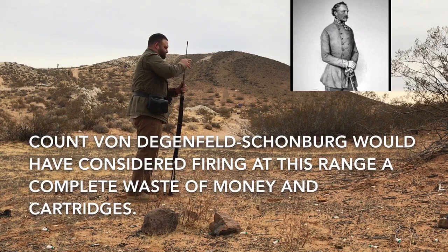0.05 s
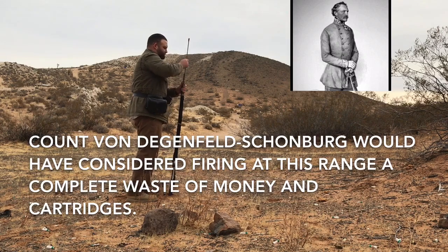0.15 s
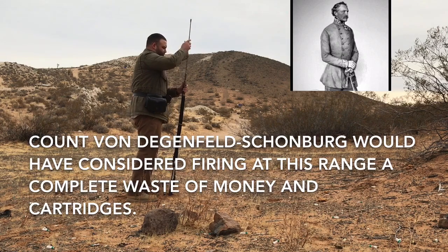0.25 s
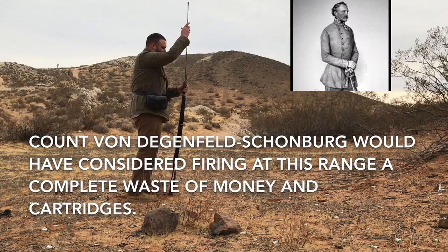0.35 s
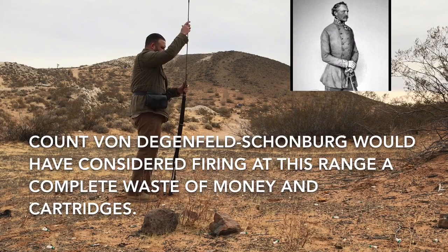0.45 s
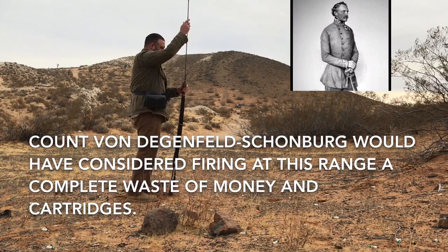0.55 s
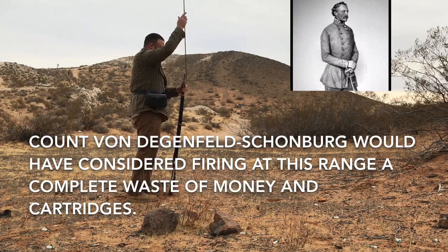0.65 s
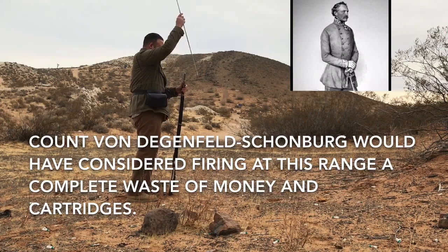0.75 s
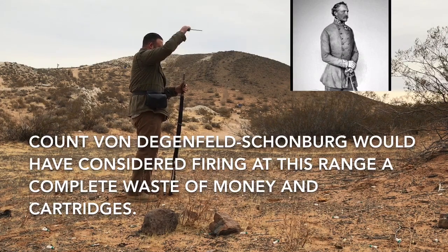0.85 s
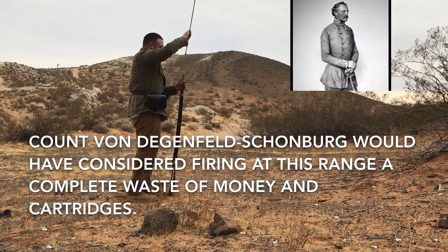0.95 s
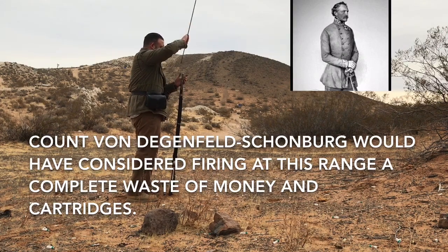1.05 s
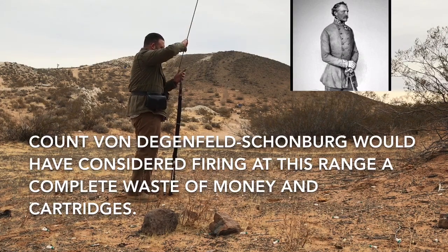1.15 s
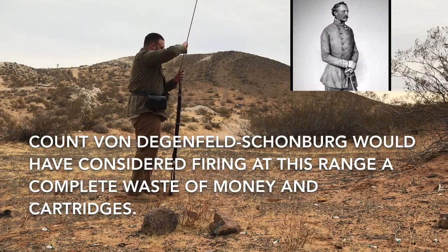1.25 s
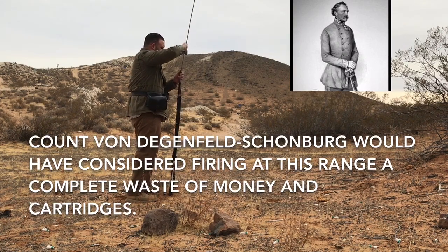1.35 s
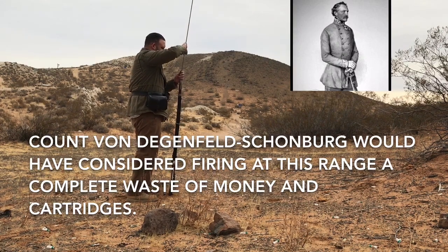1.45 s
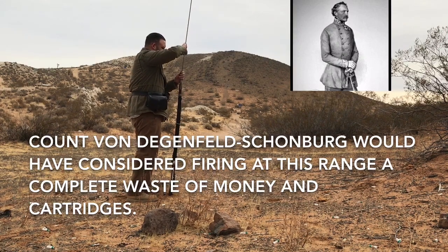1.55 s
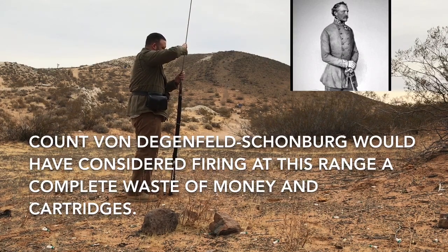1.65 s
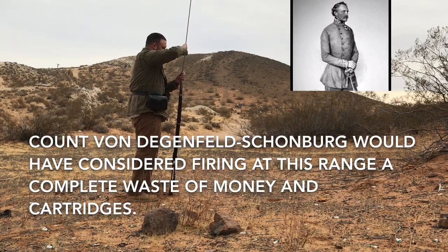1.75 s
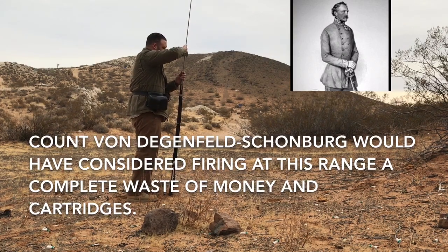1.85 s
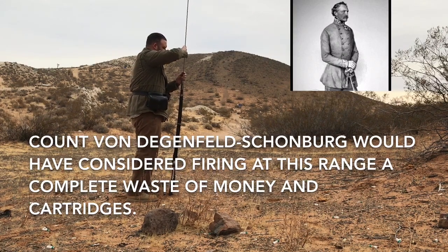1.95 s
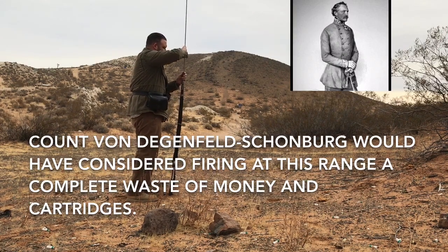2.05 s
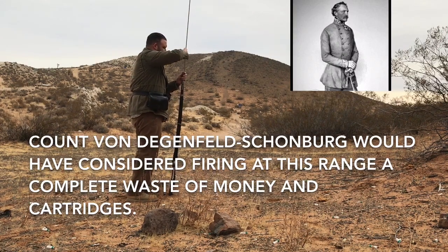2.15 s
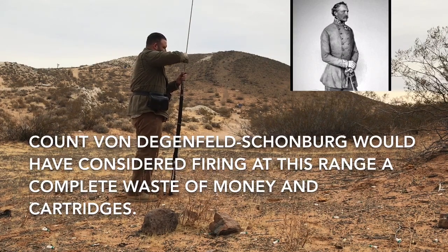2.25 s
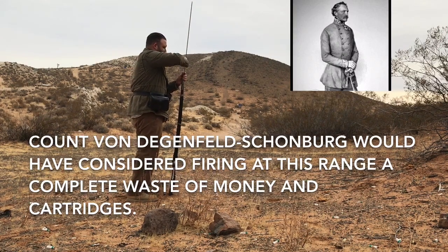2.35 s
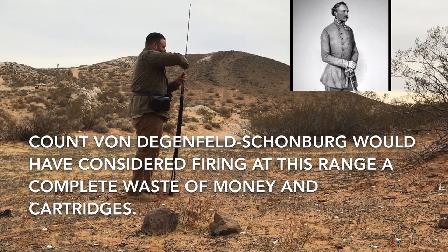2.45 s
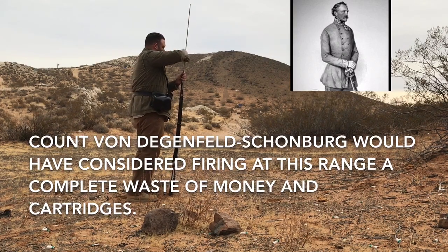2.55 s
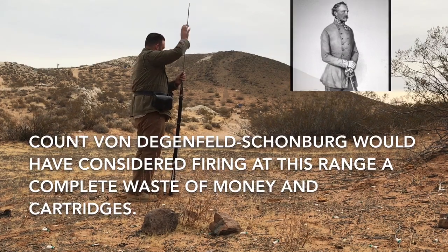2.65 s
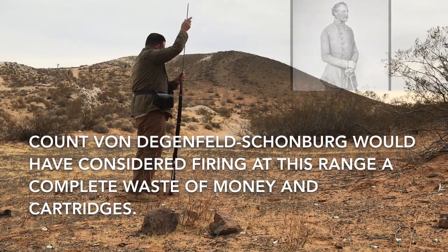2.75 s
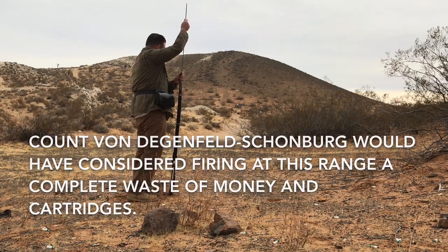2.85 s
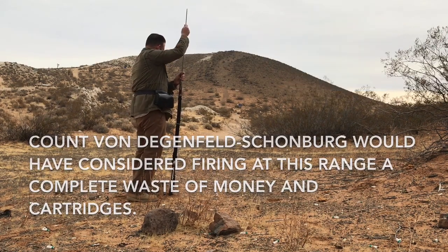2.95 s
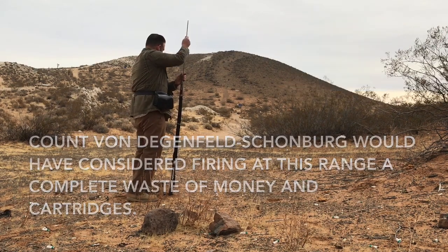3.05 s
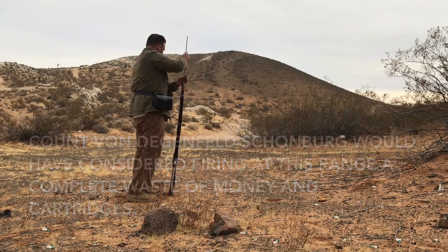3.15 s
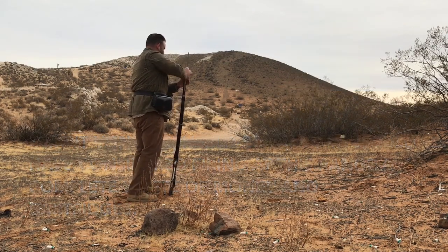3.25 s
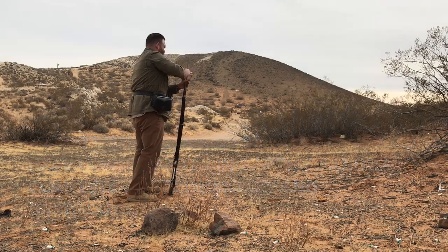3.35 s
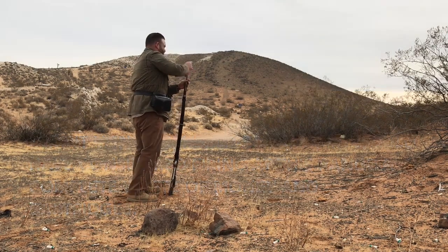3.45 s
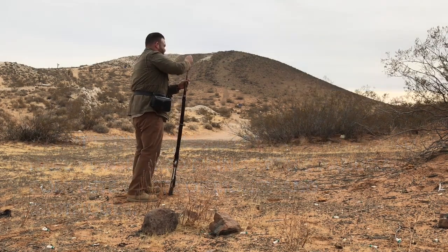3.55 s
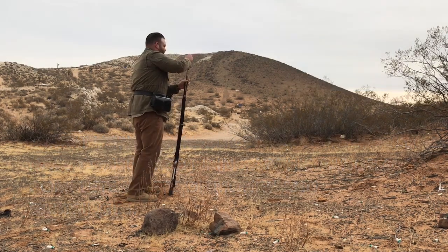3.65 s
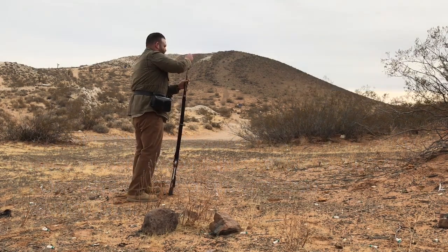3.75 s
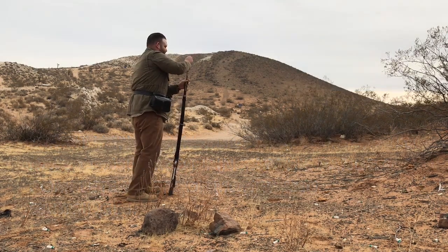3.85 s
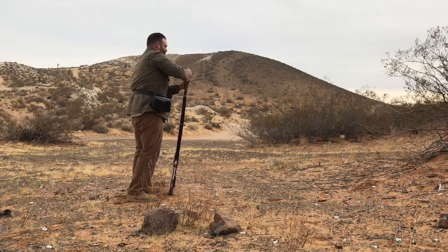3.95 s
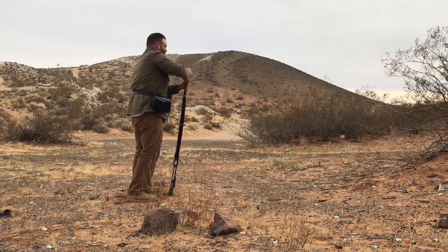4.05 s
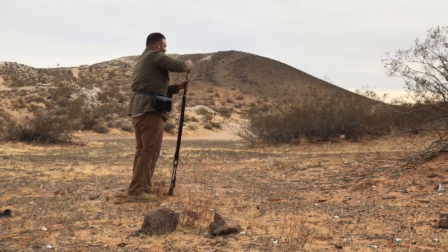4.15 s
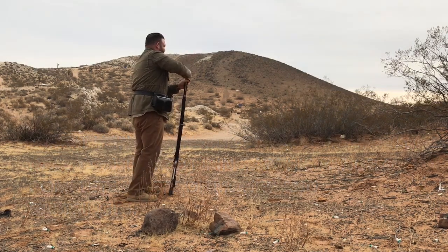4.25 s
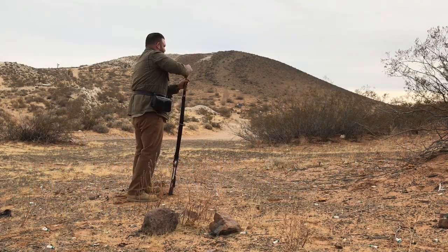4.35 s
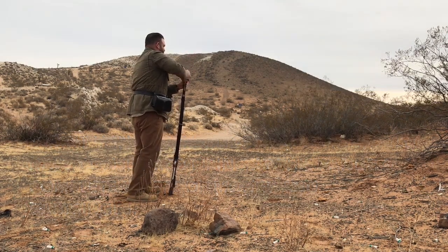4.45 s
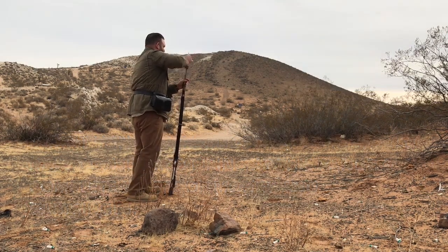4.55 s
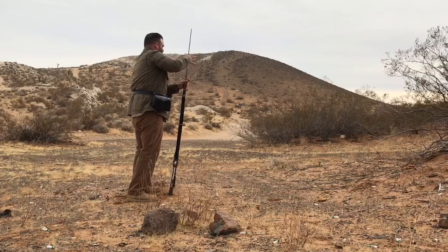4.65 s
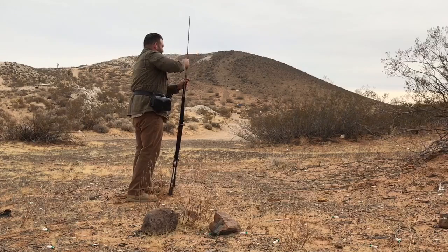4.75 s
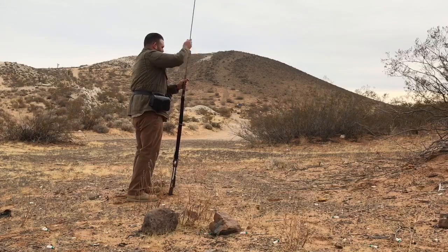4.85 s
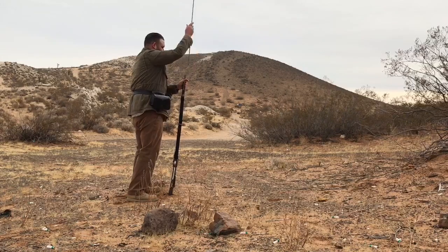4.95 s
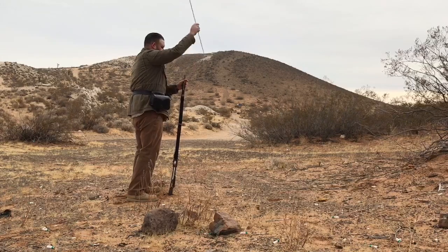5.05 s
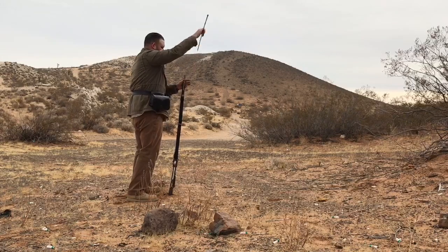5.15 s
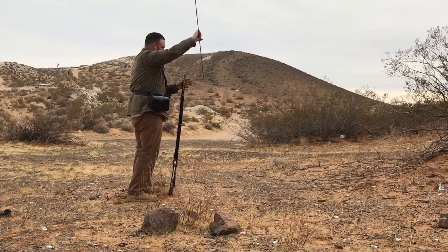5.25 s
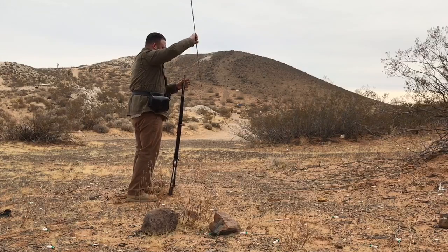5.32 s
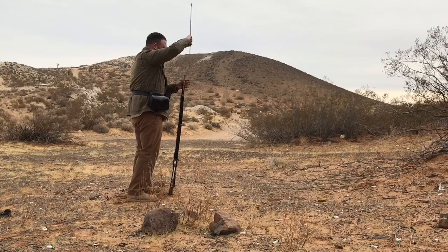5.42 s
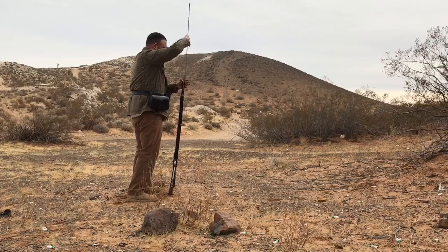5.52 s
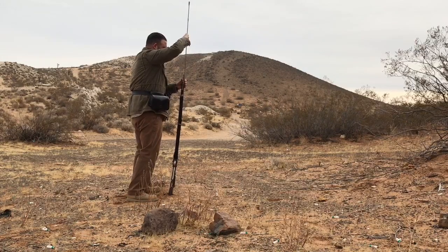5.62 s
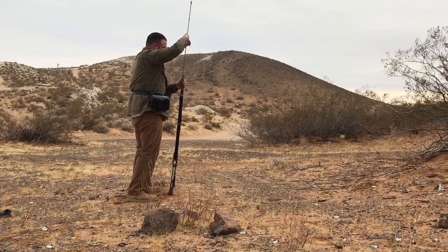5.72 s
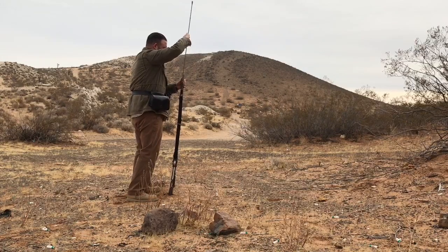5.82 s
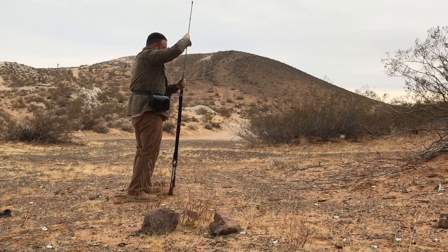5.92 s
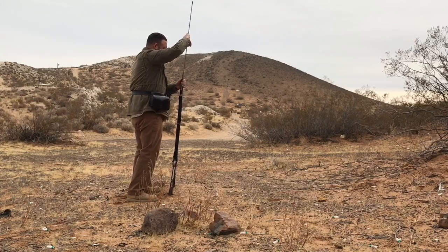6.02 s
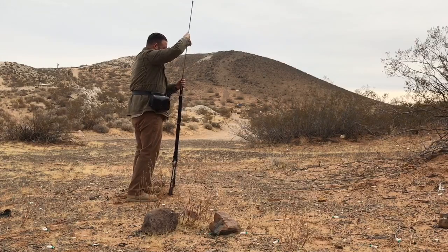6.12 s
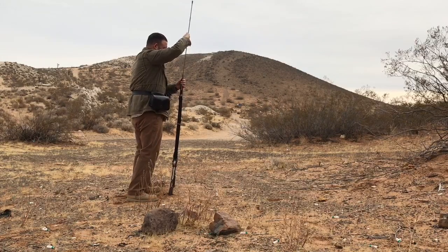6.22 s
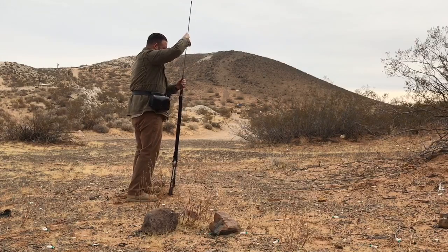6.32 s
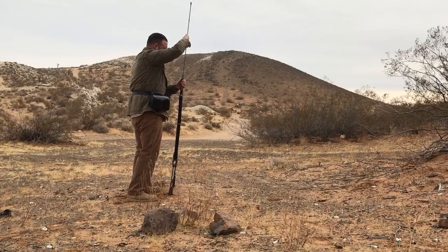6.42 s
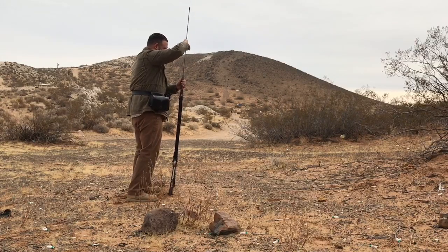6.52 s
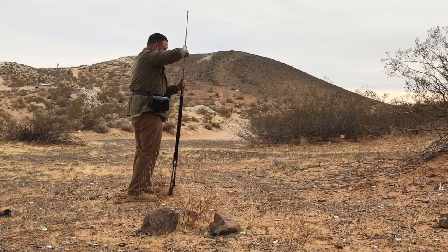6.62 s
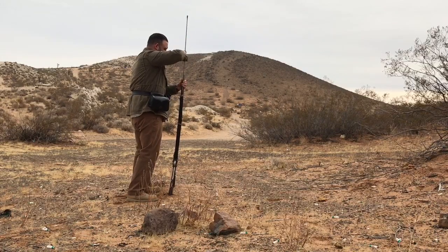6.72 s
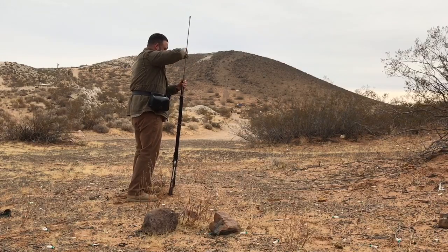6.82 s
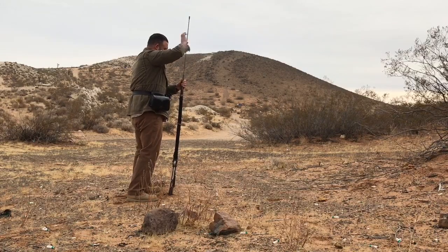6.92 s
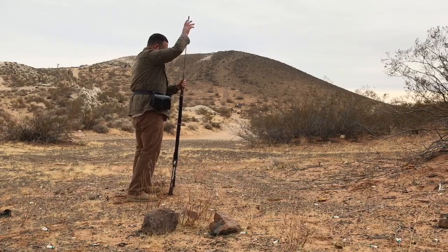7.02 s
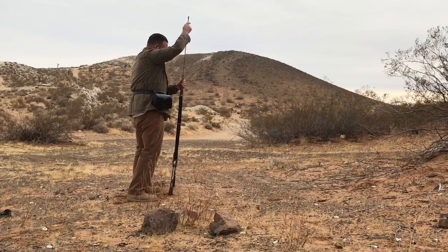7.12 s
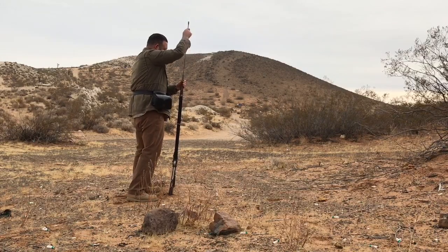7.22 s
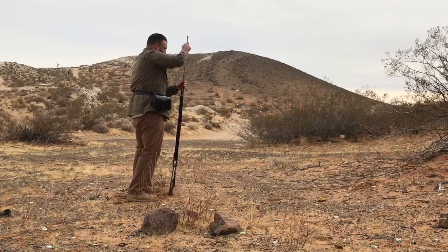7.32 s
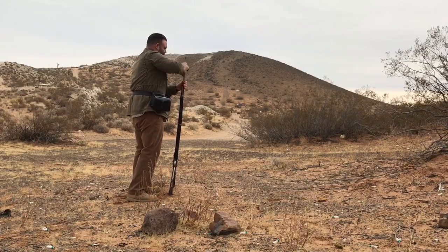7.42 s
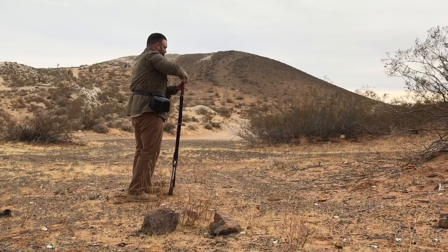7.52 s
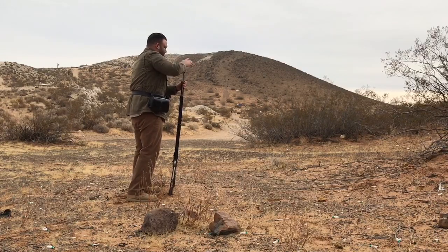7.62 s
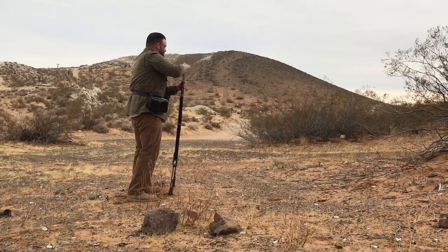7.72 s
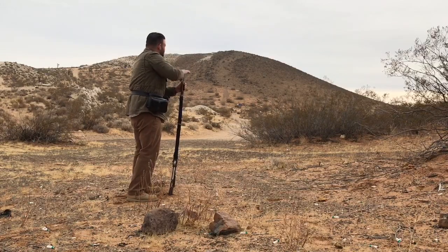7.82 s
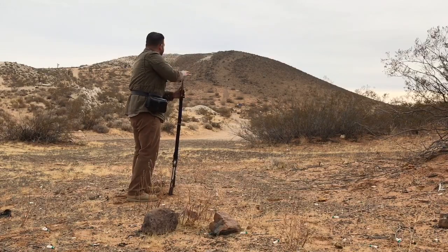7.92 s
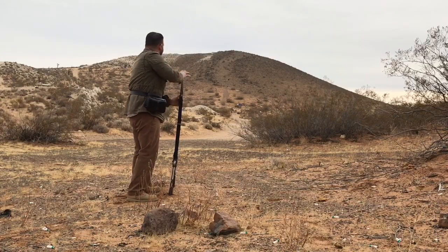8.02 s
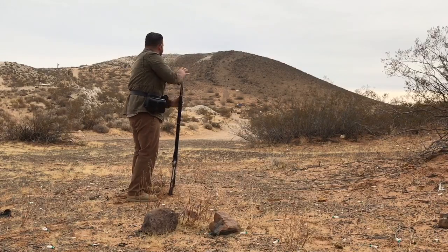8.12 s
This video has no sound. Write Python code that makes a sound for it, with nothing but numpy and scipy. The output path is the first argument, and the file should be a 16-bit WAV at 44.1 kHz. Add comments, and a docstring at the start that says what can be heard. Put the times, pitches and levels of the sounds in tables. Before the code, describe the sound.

Low, faint wind rumble lies under sparse metal clicks, brief gritty rasps and dull knocks as a rifle is loaded at the muzzle outdoors. A sharp hit starts nearly a second of dense steel chatter, then it falls quiet. A hard metallic knock with rebounds follows, then coarse cloth brushing, a thin high scrape and finally the loudest sound, a single abrupt clack. Close microphone, with hardly any echo.

```python
"""A steel ramrod taps and chatters in the barrel and at the muzzle of a muzzleloading rifle: noise bursts ring
barrel resonances and fading rod notes. It scrapes down and out again as filtered random slips, then slides back
into the stock and seats with one sharp clack. A man is loading in open desert, heard close and nearly dry:
dull knocks and the low body of harder rod blows are short noise bursts, his sleeve rustles as sparse grains,
a few low thuds swell, and low wind, made of coloured noise, rumbles on the microphone."""
import sys
import numpy as np
from scipy import signal
from scipy.fft import rfft, irfft, next_fast_len
from scipy.io import wavfile
from scipy.ndimage import uniform_filter1d

SR = 44100
rng = np.random.default_rng(int(sys.argv[2]) if len(sys.argv) > 2 else 0)


def generate_wav(signal):
    """Clip the signal to [-1, 1] and save it as 16-bit WAV at the path in sys.argv[1]."""
    frames = np.transpose(np.atleast_2d(signal))
    scaled = np.clip(frames, -1, 1) * 32767
    pcm = np.round(scaled).astype(np.int16)
    wavfile.write(sys.argv[1], SR, pcm)


N = 360738
TIME = np.arange(N) / SR
# working length of one hit (samples) and time since its start (s)
HIT_SIZE = 16384
AGE = np.arange(HIT_SIZE) / SR


def undb(db):
    """Decibels to gain."""
    return 10 ** (np.asarray(db) / 20)


def unit(x):
    """Scale to rms 1."""
    return x / np.sqrt(np.mean(x ** 2))


def blow(x, db):
    """Scale a hit so that its energy, spread over 10 ms, has this level."""
    return x * undb(db) / np.sqrt(np.sum(x ** 2) / (SR / 100))


def fade(t60):
    """Exponential decay that falls 60 dB in t60 seconds."""
    return np.exp(-np.log(1000) * AGE / max(t60, 1e-4))


def add(out, s, x):
    """Mix x in at time s."""
    i = int(s * SR)
    out[i:i + len(x)] += x[:N - i]


def colour(points, size):
    """Causal (minimum-phase) frequency response through (Hz, dB) points."""
    hz, db = np.transpose(points)
    freqs = np.fft.rfftfreq(size, 1 / SR) + 1
    gain = undb(np.interp(np.log(freqs), np.log(hz), db))
    # folding the cepstrum onto positive time makes the response causal
    cepstrum = irfft(np.log(gain), size)
    cepstrum[1:size // 2] *= 2
    cepstrum[size // 2 + 1:] = 0
    return np.exp(rfft(cepstrum))


def body(modes, direct_db):
    """Response of (Hz, width Hz, dB) resonances beside a direct path; neighbours swing in opposite sense."""
    f = np.fft.rfftfreq(HIT_SIZE, 1 / SR) + 1e-3
    response = undb(direct_db)
    for k, (hz, width, db) in enumerate(modes):
        resonance = 1j * (-1) ** k * undb(db) / (1 + 1j * (f * f - hz * hz) / (f * width))
        response = response + resonance * hz / np.hypot(f, hz / 2)
    return response


def through(x, response):
    """Filter by the first half of a frequency response's impulse."""
    return signal.fftconvolve(x, irfft(response)[:HIT_SIZE // 2])[:len(x)]


def walk(rate):
    """Random levels held 1 / rate s and slewed twice; spread near 1."""
    k = max(int(SR / rate), 1)
    steps = np.repeat(rng.standard_normal(N // k + 1), k)
    return 1.3 * uniform_filter1d(uniform_filter1d(steps, k), k)[:N]


def grains(rate, spread_db):
    """Tiny slips at random moments, mostly weak, a few strong."""
    size = undb(spread_db * np.minimum(rng.exponential(size=N), 4))
    slips = rng.random(N) < rate / SR
    return unit(slips * size * rng.choice([-1, 1], N))


def envelope(start, end, rise_db_per_s, fall_db_per_s):
    """Attack, hold from start to end, release; as a gain."""
    before, after = np.maximum(start - TIME, 0), np.maximum(TIME - end, 0)
    return undb(-rise_db_per_s * before - fall_db_per_s * after)


# ring of the loosely held rod: [f/Hz, relative level/dB, t60/s]
ROD_NOTES = [(875, -3, .14), (3835, -5, .08), (4145, -6, .1), (4393, -3, .12), (5050, -1, .093),
             (5685, -15, .1), (6788, -5, .13), (7477, -5, .12), (8210, -14, .09), (9049, -9, .09),
             (9640, -10, .1), (10370, -14, .09), (11260, -6, .065), (12190, -16, .06), (13040, -19, .07),
             (14670, -21, .06)]


def rod_modes():
    """The fading notes of the rod, one row each."""
    return np.array([undb(db) * fade(t60) * np.sin(2 * np.pi * hz * AGE) for hz, db, t60 in ROD_NOTES])


# light chatter between the blows while the rod works in the barrel: from t/s, to t/s
CHATTER_SPAN = (4.1, 4.89)
CHATTER_DB, CHATTER_SPREAD_DB, CHATTER_TREBLE_DB = -62.5, 1, -13


def chatter(count=14):
    """Light, dull taps at uneven intervals, as rows like those of ROD_TAPS."""
    chance = rng.standard_normal((count, 2))
    jitter = chance[:, 0] * np.ptp(CHATTER_SPAN) / count / 4
    times = np.linspace(*CHATTER_SPAN, count) + jitter
    levels = CHATTER_DB + CHATTER_SPREAD_DB * chance[:, 1]
    return [(s, db, CHATTER_TREBLE_DB) for s, db in zip(times, levels)]


# a harder blow has less middle and nearly the same bass; both are given for a blow of medium level
MEDIUM_DB, BASS_DB, BASS_PER_DB, MIDDLE_DB, MIDDLE_PER_DB = -54, -8.5, 0.0054, -4, -0.1267
# a bright, glancing contact loses bass (dB per dB of treble)
GLANCE_PER_DB = -0.19
# while the tip is finding the muzzle (from t/s, to t/s): less bass, more of the bare crack
AT_MUZZLE = (.7, 1.3)
MUZZLE_BASS_DB, MUZZLE_CRACK_DB = -28, 9


def tap_tones(force, treble_db, at_muzzle):
    """Bass, middle, presence and treble of a tap (dB), from its force and place."""
    bass_db = BASS_DB + BASS_PER_DB * force + GLANCE_PER_DB * treble_db + MUZZLE_BASS_DB * at_muzzle
    return bass_db, MIDDLE_DB + MIDDLE_PER_DB * force, 0, treble_db


# rod striking barrel and fittings: [t/s, level of 2.8-5.5 kHz over 10 ms/dB, treble against that/dB]
ROD_TAPS = [(0.0408, -57, -8), (0.1088, -61.5, -11), (0.3429, -52, -6), (0.8893, -56.5, 6.5),
            (0.893, -55.5, 0), (1.1706, -51, 6), (1.1776, -58, 2.5), (2.2664, -57, -4), (2.396, -60.5, -5),
            (2.5055, -65, 1.5), (2.952, -55.5, -18), (3.1159, -48.5, -3), (3.385, -64.5, -7.5),
            (3.6192, -48.5, -2.5), (3.6439, -60.5, -1), (3.8937, -53, -2), (3.966, -64, -17.5),
            (3.9743, -36.5, 2.5), (4.1873, -44.5, -13), (4.195, -45, -2), (4.202, -42.5, -1),
            (4.268, -44, -9), (4.2838, -40, -1.5), (4.3459, -43, -1), (4.3771, -40.5, 0),
            (4.396, -43.5, -0.5), (4.4362, -38.5, -0.5), (4.4904, -51.5, -16), (4.4988, -51.5, 0.5),
            (4.611, -48.5, -4), (4.6298, -54, -14), (4.6469, -44.5, -2), (4.6516, -48.5, 2),
            (4.6684, -65, -12), (4.688, -50.5, -2.5), (4.7078, -63, -22), (4.7298, -47.5, -2.5),
            (4.738, -46.5, -10), (4.763, -44, 4), (4.8211, -50, -1.5), (4.8432, -54.5, -11),
            (5.1433, -70, -1), (5.2727, -67.5, 2.5), (5.9149, -65.5, -8), (6.2725, -50.5, -8.5),
            (6.396, -58, 8), (6.5835, -32.5, -2.5), (6.6044, -38.5, -3), (6.6361, -45.5, -3),
            (6.6858, -58, -14), (6.777, -61.5, -9), (7.488, -50, -17), (7.7363, -60, -2.5),
            (8.1059, -63, 4)]
# how freely the hand lets the rod ring: [t/s, ring against contact level/dB]
HAND_FREEDOM = [(1.2, -20), (3.6, -15.5), (3.97, -35), (4.4, -10), (4.75, -16), (6.3, -12.5), (6.6, -8),
                (7.8, -10)]
# resonances of barrel and gripped rod: [f/Hz, width/Hz, relative level/dB]
BARREL_MODES = [(323, 47, -6), (599, 25, 4.5), (867, 570, -3), (1166, 110, 4), (1590, 750, -2.5),
                (2230, 190, 1.5), (2356, 176, 2), (2942, 170, 0.5), (3134, 120, 3), (3790, 210, 5),
                (4185, 364, 1), (5370, 33, -20.5), (5940, 32, -34.5), (6850, 960, 4), (6712, 1000, 3.5),
                (7820, 360, -10), (9660, 110, -37.5), (12100, 68, -21.5)]
# colour of a contact: [f/Hz, relative level/dB]
CONTACT_COLOUR = [(100, -22), (300, -4.5), (1500, -7.5), (7000, 1), (10500, -1), (13000, -13.5),
                  (16000, -22)]
# t60 of the crack at 0 dB of freedom, and dB of t60 per dB of freedom: a tight grip kills it sooner
CRACK_T60_S, GRIP_DAMPING = 0.03672, 0.23
# a tight grip dulls a note of the rod's tip: centre, half width, gain per dB of grip
TIP_HZ, TIP_WIDTH_HZ, TIP_PER_DB = 10250, 300, -0.16
# air above 10 kHz: dB gained per dB of force, dB lost per dB of grip
SPARKLE_PER_DB, SHINE_PER_DB = 0.15, 1.0


def rod_taps(linger_db=-24, linger_t60=0.078, strike_spread_db=6.5, direct_db=-8, sing_db=-77):
    """Each contact cracks into the barrel's resonances; the rod rings as far as the hand lets it."""
    out, freqs = np.zeros(N), np.fft.rfftfreq(HIT_SIZE, 1 / SR)
    contact_colour, rings = colour(CONTACT_COLOUR, HIT_SIZE), rod_modes()
    edges = [(230, 1300), (1300, 2800), (2800, 5500), (5500, 17000)]
    bands = [signal.butter(5, edge, "band", fs=SR, output="sos") for edge in edges]
    top = np.clip((freqs - 10000) / 3000, 0, 1)
    tip = 1 / (1 + ((freqs - TIP_HZ) / TIP_WIDTH_HZ) ** 2)
    for s, db, treble_db in list(ROD_TAPS) + chatter():
        free_db = np.interp(s, *np.transpose(HAND_FREEDOM))
        force = db - MEDIUM_DB
        at_muzzle = AT_MUZZLE[0] < s < AT_MUZZLE[1]
        # every point along the rod wakes the modes differently
        modes = [(hz, width, peak + strike_spread_db * rng.standard_normal())
                 for hz, width, peak in BARREL_MODES]
        barrel = body(modes, direct_db + MUZZLE_CRACK_DB * at_muzzle)
        note_gains = rng.choice([-1, 1], len(ROD_NOTES)) * undb(2 * rng.standard_normal(len(ROD_NOTES)))
        ring = note_gains @ rings
        decay = fade(CRACK_T60_S * undb(GRIP_DAMPING * free_db)) + undb(linger_db) * fade(linger_t60)
        contact = rng.standard_normal(HIT_SIZE) * decay
        # a tight grip damps the tip and the highest notes; force adds to the latter
        grip_db = -12 - free_db
        tip_db = tip * TIP_PER_DB * max(grip_db, 0)
        top_db = top * (SPARKLE_PER_DB * force - SHINE_PER_DB * grip_db)
        crack = irfft(rfft(contact) * barrel * contact_colour * undb(tip_db + top_db))[:HIT_SIZE // 2]
        tones = tap_tones(force, treble_db, at_muzzle)
        tap = sum(blow(signal.sosfilt(band, crack), tone) for band, tone in zip(bands, tones))
        add(out, s, undb(db) * tap)
        add(out, s, blow(ring, db + free_db))
    # clear of the muzzle, the rod sings on faintly for HIT_SIZE samples
    add(out, 4.845, undb(sing_db) * fade(t60=1.3) * np.sin(2 * np.pi * 2719 * AGE))
    return out


# pushes and pulls of the rod: [start t/s, length/s, level in mid-stroke/dB, note the rasp favours f/Hz]
ROD_STROKES = [(0.175, 0.038, -55.5, 3770), (0.252, 0.046, -54, 3450), (0.349, 0.027, -60, 3700),
               (0.556, 0.059, -61, 5980), (2.205, 0.22, -70, 3780), (2.961, 0.13, -57, 4000),
               (3.128, 0.068, -51, 5100), (3.218, 0.016, -56.5, 3800), (3.254, .055, -60, 3880),
               (3.918, 0.033, -47.5, 4370), (4.245, 0.014, -44.5, 5170), (4.392, 0.072, -55.5, 2500),
               (4.546, .25, -52, 3700), (6.051, 0.1, -69, 7400), (6.474, 0.24, -68.5, 3060),
               (7.168, 0.05, -69.5, 3620), (7.26, 0.08, -57.5, 7400), (7.382, 0.13, -56.5, 7800)]
# rise as the rod takes hold, growth over the stroke as it gathers speed, fall as it stops
GRAB_DB_PER_S, SWELL_DB, STOP_DB_PER_S = 700, 4.5, 1100


def stroke_gain():
    """Loudness of the sliding rod: every stroke takes hold, swells and stops."""
    gain = 0
    for s, length, db, hz in ROD_STROKES:
        swell_db = SWELL_DB * np.clip((TIME - s) / length - .5, -.5, .5)
        gain = gain + envelope(s, s + length, GRAB_DB_PER_S, STOP_DB_PER_S) * undb(db + swell_db)
    return gain


# how hard the rod bears on the barrel: [t/s, gain of the rasp's bands centred below 3 kHz/dB]
ROD_BEARING = [(.2, 3.5), (3.15, 3.5), (3.93, -0.5), (4.6, 5), (7.3, 5.5)]
# colour of steel rubbing on steel: [f/Hz, relative level/dB]
FRICTION_COLOUR = [(150, -24), (400, -9), (1000, -6), (2000, -3), (4000, 1), (7500, 0), (11500, -6),
                   (13000, -19), (16000, -25)]
# lift and half width of the note that the rasp favours
FAVOUR_DB, FAVOUR_OCTAVES = 5, 0.14


def rod_slide(patchy_db=4.5, ring_db=-11):
    """Steel slips on fouled steel and rings the rod; moving contact favours one narrow band, then another."""
    slips = grains(rate=2200, spread_db=3.8) * undb(2.4 * walk(110))
    rasp = unit(through(slips, body(BARREL_MODES, direct_db=-10) * colour(FRICTION_COLOUR, HIT_SIZE)))
    rasp = rasp + undb(ring_db) * unit(through(slips, rfft(rod_modes().sum(axis=0))))
    size = next_fast_len(N)
    spectrum = rfft(rasp, size)
    # bands widen with pitch: band k is centred on 10 k^2 Hz
    band = np.sqrt(np.fft.rfftfreq(size, 1 / SR) / 10)
    moments = np.arange(0, N / SR, 1 / 70)
    note_points = [(t, np.log2(hz)) for s, length, db, hz in ROD_STROKES for t in (s, s + length)]
    note = np.interp(moments, *np.transpose(note_points))
    bearing_db, patches = np.interp(moments, *np.transpose(ROD_BEARING)), 0
    for k in range(4, 40):
        centre = 10 * k * k
        patch_db = patchy_db * rng.standard_normal(len(moments))
        patch_db += FAVOUR_DB / (1 + ((np.log2(centre) - note) / FAVOUR_OCTAVES) ** 2)
        patch_db += bearing_db * (centre < 3000)
        patch = irfft(spectrum * np.clip(1 - np.abs(band - k), 0, 1), size)[:N]
        patches = patches + patch * np.interp(TIME, moments, undb(patch_db))
    return unit(patches) * stroke_gain()


# the rod driven home, with its rebounds: [t/s, level over 10 ms/dB]
SEATING_HITS = [(7.9545, -31), (7.9552, -22.5), (7.968, -43.5), (7.9721, -42)]
# resonances of the stock's rod channel: [f/Hz, width/Hz, relative level/dB]
CHANNEL_MODES = [(699, 156, -4.5), (1580, 107, 1), (2050, 270, 2.5), (2760, 290, -3), (3550, 86, 1.5),
                 (4580, 280, -6.5), (6400, 230, 6.5), (7170, 83, -10.5), (8500, 240, -13.5),
                 (9900, 430, -14.5)]


def rod_seating(linger_db=-23):
    """The rod hits the end of its channel and rebounds with a dry clack."""
    out = np.zeros(N)
    clack_colour = colour([(100, -7), (250, 0.0), (11000, -9), (16000, -21.0)], HIT_SIZE)
    channel = body(CHANNEL_MODES, direct_db=-19) * clack_colour
    for s, db in SEATING_HITS:
        # one hard impact, roughened by the crunch of the surfaces
        contact = rng.standard_normal(HIT_SIZE) * (fade(t60=.007) + undb(linger_db) * fade(t60=.055))
        contact[10] += undb(20)
        add(out, s, blow(irfft(rfft(contact) * channel)[:HIT_SIZE // 2], db))
    return out


# dull knocks, and the low body of the harder rod blows: [t/s, level over 10 ms/dB, f/Hz]
DULL_KNOCKS = [(0.028, -52.5, 400), (0.232, -55.5, 388), (0.902, -66, 330), (1.061, -62, 980),
               (1.177, -62.5, 316), (3.467, -55, 845), (4.267, -44.5, 990), (4.439, -49, 213),
               (4.581, -56, 324), (6.128, -57.5, 470), (6.157, -59, 670), (6.276, -56, 594),
               (6.585, -45, 840), (6.803, -57, 300), (7.395, -53, 1090), (7.43, -55.5, 1010),
               (7.49, -51.5, 1210), (7.537, -59, 476), (7.75, -60.5, 610), (7.957, -47.5, 213)]


def dull_knocks(width_share=0.27, t60=0.033):
    """Dull knocks and the low body of harder rod blows: short noise bursts, each through one broad resonance."""
    out = np.zeros(N)
    knock_colour = colour([(100, -10.5), (250, 2), (1500, 4.0), (5000, 8.0)], HIT_SIZE)
    for s, db, hz in DULL_KNOCKS:
        resonance = body([(hz, hz * width_share, 0)], direct_db=-48)
        burst = rng.standard_normal(HIT_SIZE) * fade(t60)
        add(out, s, blow(irfft(rfft(burst) * resonance * knock_colour)[:HIT_SIZE // 2], db))
    return out


# arm movements that rustle the sleeve: [fastest moment t/s, length/s, level at that moment/dB]
ARM_REACHES = [(1.6, 0.42, -73), (1.77, 0.054, -67.5), (2.79, 0.56, -71.5), (3.5, 0.47, -73.5),
               (5.343, 0.19, -71.5), (6.927, 0.23, -54.5), (7.584, 0.57, -69), (7.983, 0.17, -65.5)]
# fall of the rustle half a length from the fastest moment, and the power of time that it follows
REACH_FALL_DB, REACH_SHAPE = 12, 1.62


def reach_gain():
    """Loudness of the cloth: the arm speeds up and slows down again."""
    return sum(undb(db - REACH_FALL_DB * np.abs(2 * (TIME - s) / length) ** REACH_SHAPE)
               for s, length, db in ARM_REACHES)


# colour of the coarse cloth: [f/Hz, relative level/dB]
CLOTH_COLOUR = [(150, -5.5), (500, 7), (1200, 4.5), (2500, 3.5), (5000, 2), (8000, 0.5), (11000, -9),
                (16000, -16.5)]


def sleeve():
    """Coarse cloth: a fine rub, and threads that snap past each other in a sparse crackle."""
    rub = grains(rate=9000, spread_db=2.5) * undb(1.5 * walk(70))
    snaps = grains(rate=220, spread_db=4.5)
    return unit(through(rub + 0.79 * snaps, colour(CLOTH_COLOUR, HIT_SIZE))) * reach_gain()


# small creases snapping as the arm moves: [t/s, level over 10 ms/dB]
CLOTH_CREASES = [(1.405, -75.5), (1.534, -63.5), (1.58, -66.5), (1.674, -59), (5.39, -66.5), (6.149, -65.5),
                 (6.21, -68), (7.029, -70)]


def creases(t60=0.022):
    """Short, soft ticks: fading noise with the colour of the cloth."""
    out, cloth = np.zeros(N), colour(CLOTH_COLOUR, HIT_SIZE)
    for s, db in CLOTH_CREASES:
        tick = rng.standard_normal(HIT_SIZE) * fade(t60)
        add(out, s, blow(through(tick, cloth), db))
    return out


def scrub(x, echo_db=-24):
    """Ground and bushes scatter a faint, short echo."""
    scatter = rng.standard_normal(HIT_SIZE) * fade(.12) * (1 - fade(.05))
    return x + undb(echo_db) * through(x, rfft(scatter / np.linalg.norm(scatter)))


# low thuds: [start t/s, peak level/dB, f/Hz, length/s]
LOW_THUDS = [(1.261, -36, 72.5, 0.064), (4.277, -44, 70.4, 0.1), (7.964, -40.5, 79, 0.1)]


def thuds():
    """A few slow, deep swings that swell and die."""
    out = np.zeros(N)
    for s, db, hz, length in LOW_THUDS:
        swell = signal.windows.hann(int(length * SR))
        add(out, s, undb(db) * swell * np.sin(2 * np.pi * hz * TIME[:len(swell)]))
    return out


# colours of the steady air and of a gust on the microphone: [f/Hz, relative level/dB]
AIR_COLOUR = [(8, 11.5), (25, -8), (50, -6.5), (66, -3.5), (80, 2), (95, -4.5), (125, -6), (155, -14),
              (205, -17.5), (260, -25.5), (420, -31.5), (1000, -35), (4000, -43.5), (15000, -49.5)]
GUST_COLOUR = [(6, 8.5), (25, 4), (50, -2.5), (80, -8.5), (110, -21), (200, -37.5), (600, -69.5)]
# gusts on the microphone: [start t/s, length of the hold/s, level/dB]; all rise and die away alike
WIND_GUSTS = [(.4, 0.16, -52), (1.245, 0.14, -41.5), (4.294, 0.17, -51)]
GUST_RISE_DB_PER_S, GUST_FALL_DB_PER_S = 107.5, 56


def wind(air_db=-52.5):
    """A wavering low rumble with a faint hiss; now and then a gust buffets the microphone."""
    waver_db = .5 * walk(3)
    air = unit(through(rng.standard_normal(N), colour(AIR_COLOUR, HIT_SIZE))) * undb(air_db + waver_db)
    gust_gain = sum(undb(db) * envelope(s, s + length, GUST_RISE_DB_PER_S, GUST_FALL_DB_PER_S)
                    for s, length, db in WIND_GUSTS)
    buffeting = unit(through(rng.standard_normal(N), colour(GUST_COLOUR, HIT_SIZE)))
    return air + buffeting * gust_gain


def scene():
    """The rifle and its loader in the open air; thuds and wind get no echo."""
    rod = rod_taps() + rod_slide() + rod_seating()
    handling = dull_knocks() + sleeve() + creases()
    return (scrub(rod + handling) + thuds() + wind())[None]


def record(dry):
    """The recorder cuts the top steeply above 16 kHz."""
    low_pass = signal.ellip(10, .2, 70, 16000, fs=SR, output="sos")
    return signal.sosfilt(low_pass, dry)


dry = scene()
out = record(dry)
generate_wav(out)
```